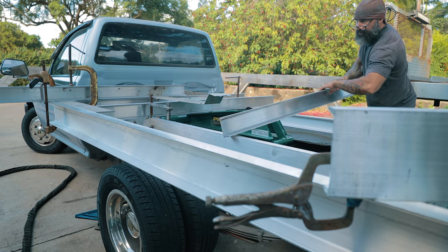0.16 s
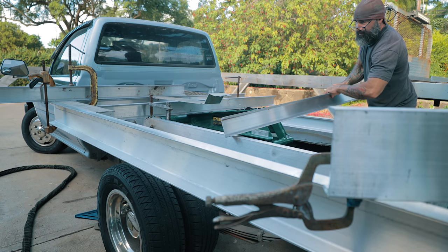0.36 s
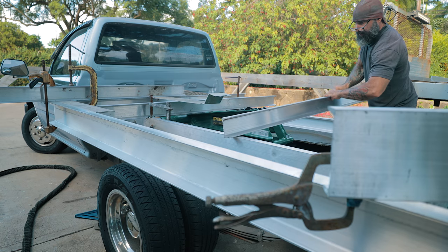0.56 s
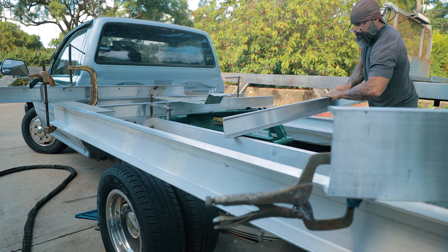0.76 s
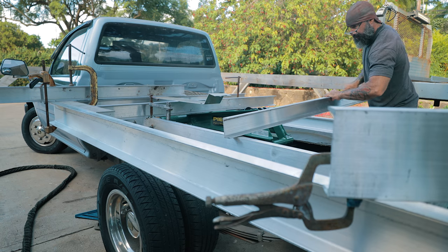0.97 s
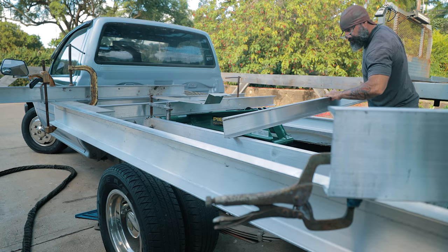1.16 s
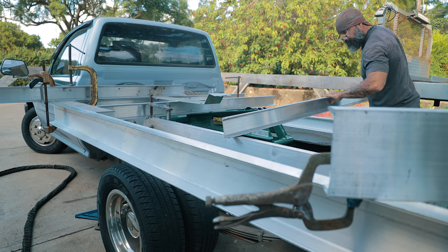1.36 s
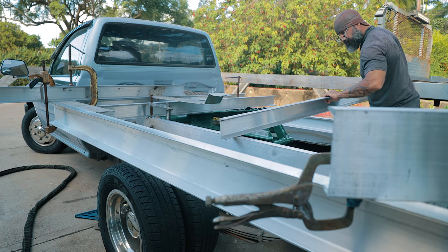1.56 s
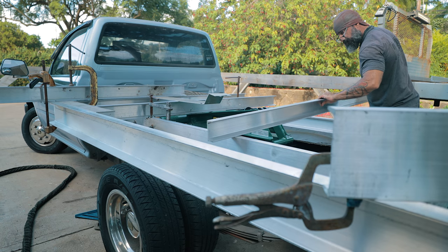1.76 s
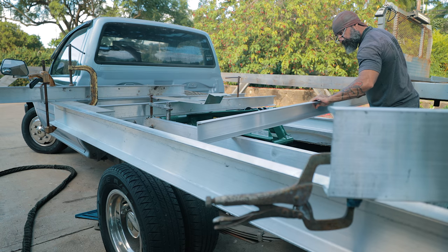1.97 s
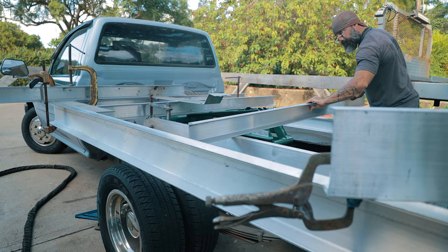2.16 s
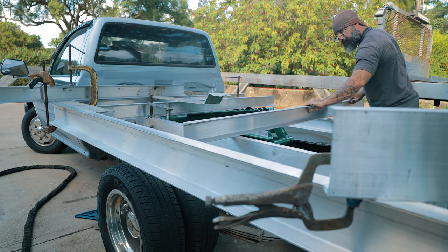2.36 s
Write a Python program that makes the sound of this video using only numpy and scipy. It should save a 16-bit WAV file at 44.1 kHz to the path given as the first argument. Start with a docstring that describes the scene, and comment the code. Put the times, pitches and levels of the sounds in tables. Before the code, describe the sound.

Close mono sound of a long metal channel: brief graze and light knocks, one hard clank with quick rattling bounces, a short ringing decay, near quiet, then a snag and hollow scraping slide outdoors.

```python
"""Metal channel lowered onto a truck bed

An aluminium channel grazes the metal frame of a truck bed outdoors, knocks, drops with a loud rattling
clank and rings out; then it is pushed along the cross members, scraping, groaning and humming.
Blows are decaying noise bands and sine modes; scraping is a stream of tiny catches convolved with the
channel's response; hum and groan are unsteady tones; the yard is steady coloured noise."""
import sys
import numpy as np
from scipy import signal
from scipy.fft import rfft, irfft
from scipy.io import wavfile

SR = 44100
rng = np.random.default_rng(int(sys.argv[2]) if len(sys.argv) > 2 else 0)


def digitize_waveform(pressure):
    """Quantize a signal to 16-bit integers and store it at the path in sys.argv[1].

    Rows of a 2-D input are taken as channels; values are limited to [-1, 1].
    """
    field = np.atleast_2d(pressure).T
    bounded = np.clip(field, -1, 1)
    quanta = np.round(bounded * 32767).astype(np.int16)
    wavfile.write(sys.argv[1], SR, quanta)


N = 105840
TIME = np.arange(N) / SR  # s
BAND_EDGES_HZ = 22 * 2 ** (np.arange(30) / 3)  # third octaves
BAND_CENTRES_HZ = np.sqrt(BAND_EDGES_HZ[1:] * BAND_EDGES_HZ[:-1])
ATTACK_S = 0.002  # linear rise of a blow and of the snag


def from_db(db):
    """Logarithmic level: decibels to amplitude gain."""
    return 10 ** (np.asarray(db) / 20)


def rms_one(x):
    """Power normalisation: scale a signal to unit rms."""
    return x / np.sqrt(np.mean(x ** 2) + 1e-20)


def unit_energy(x):
    """Energy normalisation: scale an impulse response to unit energy."""
    return x / np.sqrt(np.sum(x ** 2) + 1e-20)


def at_hz(points, hz):
    """Logarithmic frequency axis: interpolate a table of (hz, value)."""
    table_hz, value = np.transpose(points)
    return np.interp(np.log(hz), np.log(table_hz), value)


def dying(t, t60):
    """Exponential decay: the amplitude falls by 60 dB in t60 seconds."""
    return np.exp(-np.log(1000) * t / t60)


def drift(rate):
    """Random modulation: normal values, rate per second, joined by straight lines."""
    knots = rng.standard_normal(int(rate * N / SR) + 2)
    return np.interp(TIME * rate, np.arange(len(knots)), knots)


def noise(spectrum):
    """Spectral shaping: white noise filtered to a given colour, with unit rms."""
    hz = np.maximum(np.arange(N // 2 + 1) * SR / N, 1)
    white = rfft(rng.standard_normal(N))
    return rms_one(irfft(white * from_db(at_hz(spectrum, hz)), N))


def noise_bands(spectrum):
    """Filter bank: coloured noise split into overlapping third-octave bands that sum to the whole."""
    whole = rfft(noise(spectrum))
    hz = np.arange(N // 2 + 1) * SR / N
    return [irfft(whole * np.interp(hz, BAND_CENTRES_HZ, share), N)
            for share in np.eye(len(BAND_CENTRES_HZ))]


# spectral shape of the outdoor background: pitch_hz [Hz], density_db [relative dB per Hz]
YARD_SPECTRUM = [(15, -52), (28, -16), (52, 4), (125, -4), (180, -7), (250, -7), (320, -13.5), (600, -13),
                 (1100, -18.5), (1900, -24), (3900, -21), (4600, -28.5), (9000, -35.5), (15500, -42.5)]
YARD_DB = -52.5  # rms level


def yard():
    """Stationary noise: a steady outdoor background of low rumble and faint hiss."""
    return from_db(YARD_DB) * noise(YARD_SPECTRUM)


# level of the bending hum before its flutter: start_s [s], level_db [dB]
HUM_LEVEL = [(0, -38.5), (.11, -50), (.2, -55), (1.0, -88), (1.65, -81), (1.8, -45), (1.95, -43.5),
             (2.07, -39), (2.15, -52), (2.23, -34.5), (2.3, -50), (2.4, -45)]
HUM_HZ, HUM_WANDER_HZ = 107, 4
HUM_FLUTTER_DB, OCTAVE_DB, OCTAVE_FLUTTER_DB = 1.0, -11, 1


def bending_hum():
    """Sustained oscillation: friction keeps the lowest bending mode going, unsteady in pitch and level."""
    pitch_hz = HUM_HZ + HUM_WANDER_HZ * drift(11)
    phase = 2 * np.pi * np.cumsum(pitch_hz) / SR
    level_db = np.interp(TIME, *np.transpose(HUM_LEVEL)) + HUM_FLUTTER_DB * drift(30)
    octave = from_db(OCTAVE_DB + OCTAVE_FLUTTER_DB * drift(23)) * np.sin(2 * phase)
    return from_db(level_db) * rms_one(np.sin(phase) + octave)


# contacts of channel and frame: start_s [s], level_db [dB], then relative to that level:
# bass thud_db [dB], clang_db near 3 kHz [dB], sharp edge_db [dB], free ringing_db of the clear modes [dB]
CONTACTS = [(0.003, -37.5, 12, -4.5, -14, -5.5), (0.221, -25, -3, -7, -9, -20),
            (0.305, -42.5, 11, -22, -17, 2.5), (0.354, -38.5, 19, 4.5, 18.5, 0),
            (0.366, -28, 6.5, -2, -8, -26), (0.388, -30, 9, 7, 10.5, -7.5), (0.432, -28, -5, 2.5, 9, -22),
            (0.492, -38, 11.5, 10, 17, -7.5), (0.651, -16, -6, -1, -1, -2.5),
            (0.675, -22, 5.5, 5.5, 3, -27), (0.706, -23.5, 0, 6, 4.5, -28),
            (0.73, -31.5, -18, 5.5, 12.5, -2), (0.762, -26.5, -9, 5, 6, -31),
            (0.803, -37.5, -12, 11.5, 14, -18), (1.692, -26.5, -12, -11, -5, -21)]
THUD_HZ, BODY_LOW_HZ, BODY_HIGH_HZ = 172, 486, 930
CLANG_LOW_HZ, CLANG_HIGH_HZ, EDGE_HZ = 2160, 3600, 4070


def contact_db(contact, hz):
    """Excitation spectrum: the strength with which one contact drives a frequency."""
    _, level_db, thud_db, clang_db, edge_db, _ = contact
    tilt = [(THUD_HZ, thud_db), (BODY_LOW_HZ, 0), (BODY_HIGH_HZ, 0),
            (CLANG_LOW_HZ, clang_db), (CLANG_HIGH_HZ, clang_db), (EDGE_HZ, edge_db)]
    return level_db + at_hz(tilt, hz)


# crowded weaker modes of channel and frame: pitch_hz [Hz], density_db [relative dB per Hz]
CROWD_SPECTRUM = [(30, -21), (55, -8), (85, -4.5), (150, -10.5), (280, -5.5), (450, 2), (780, 1.5),
                  (1200, -4), (2100, -12), (3850, -12), (4350, -23), (7000, -33), (10000, -41),
                  (15500, -51)]
# decay of the crowded modes: pitch_hz [Hz], t60_s [s]
CROWD_T60 = [(60, 1.32), (170, 0.89), (340, 0.55), (700, 0.41), (1400, 0.35), (3500, 0.25), (6000, 0.22),
             (14000, 0.17)]
CRACK_DB, CRACK_S = -23, 0.002  # slight extra amplitude relative to the tail, and its time constant


def crowded_ringing():
    """Diffuse modal decay: each blow fills the crowded modes, which die faster towards the treble."""
    out = np.zeros(N)
    crack = from_db(CRACK_DB) * np.exp(-TIME / CRACK_S)
    onset = np.minimum(TIME / ATTACK_S, 1) * (1 + crack)
    for hz, band in zip(BAND_CENTRES_HZ, noise_bands(CROWD_SPECTRUM)):
        tail_energy = (onset * dying(TIME, at_hz(CROWD_T60, hz))) ** 2
        energy = np.zeros(N)
        for contact in CONTACTS:
            start = max(int(contact[0] * SR), 0)
            energy[start:] += from_db(contact_db(contact, hz)) ** 2 * tail_energy[:N - start]
        out += band * np.sqrt(energy)
    return out


# clear modes of the channel: pitch_hz [Hz], struck_db [relative dB], t60_s when struck [s],
# sliding_db [relative dB]
CHANNEL_MODES = [(399.6, -23, 0.44, -1), (460.4, -21, 0.71, -2), (488, -12.5, 0.76, -0.5),
                 (566.4, -21, 0.79, 0.5), (753, 3.5, .33, -7), (796, -6, 1.0, -16), (835, 1, .1, -8),
                 (655, -27, 0.16, -17), (729, -16, 0.16, -35), (894, -5, 0.52, -16), (992, -6.5, 0.6, -7.5),
                 (1145, -7, 0.51, -10.5), (1386, -12, 0.75, -42), (1736, -10.5, 0.34, -16),
                 (1956, -9, 0.21, -18), (2198, -10, .45, -26.5), (2855, -15, 0.52, -3),
                 (3419, -7.5, 0.23, -10), (3840, -25, 0.35, -17), (4810, -27.5, 0.42, -30),
                 (6120, -27, 0.27, -38), (7370, -42, 0.55, -17)]
STRUCK_MODES_DB, MODE_SCATTER_DB = -2, 1.0
CONTACT_S = 0.0003  # time constant with which a mode builds up


def clear_ringing():
    """Modal superposition: every blow adds energy to each clear mode, with a strength of its own."""
    out = np.zeros(N)
    scatter_db = MODE_SCATTER_DB * rng.standard_normal((len(CONTACTS), len(CHANNEL_MODES)))
    for k, (hz, struck_db, t60, _) in enumerate(CHANNEL_MODES):
        tail_energy = (dying(TIME, t60) * (1 - np.exp(-TIME / CONTACT_S))) ** 2
        energy = np.zeros(N)
        for contact, luck_db in zip(CONTACTS, scatter_db):
            start = max(int(contact[0] * SR), 0)
            ringing_db = contact[-1]
            level_db = STRUCK_MODES_DB + struck_db + contact_db(contact, hz) + ringing_db + luck_db[k]
            energy[start:] += from_db(level_db) ** 2 * tail_energy[:N - start]
        out += np.sqrt(energy) * np.sin(2 * np.pi * (hz * TIME + rng.random()))
    return out


# crowded modes while sliding: pitch_hz [Hz], density_db [relative dB per Hz]
SCRAPE_SPECTRUM = [(60, -34), (140, -12), (210, -2.5), (280, -12), (400, 2), (580, 1), (720, -6),
                   (1200, -8), (1550, -11), (2400, -9), (3850, -10), (4500, -23.5), (6000, -27),
                   (9000, -35.5), (15500, -45)]
SCRAPE_T60_S, SCRAPE_MODES_DB = 0.14, -3
HAND_DAMPING = 0.22  # the hand shortens the clear modes' t60 by this factor
RASP_HZ, HISS_HZ = 1350, 5030  # lower limits of rasp and hiss


def sliding_response():
    """Impulse response: the hand-held channel after one tiny catch, split into body, rasp and hiss."""
    t = TIME[:SR // 2]
    crowd = unit_energy(noise(SCRAPE_SPECTRUM)[:len(t)] * dying(t, SCRAPE_T60_S))
    modes = np.zeros(len(t))
    for k, (hz, _, t60, sliding_db) in enumerate(CHANNEL_MODES):
        tone = np.sin(2 * np.pi * hz * t) * dying(t, t60 * HAND_DAMPING)
        modes += from_db(sliding_db) * tone * (-1) ** k  # alternating polarity
    response = crowd + from_db(SCRAPE_MODES_DB) * unit_energy(modes)
    zones = []
    for hz, kind in [(RASP_HZ, "low"), ([RASP_HZ, HISS_HZ], "band"), (HISS_HZ, "high")]:
        zone_filter = signal.butter(4, hz, kind, fs=SR, output="sos")
        zones.append(unit_energy(signal.sosfilt(zone_filter, response)))
    return zones


# first touch along the frame: start_s [s], body_db, rasp_db, hiss_db [dB before the zone gains]
GRAZE_STROKE = [(0.005, -28.5, -26, -41.5), (0.044, -45.5, -73, -70), (0.102, -45, -59.5, -56.5),
                (0.17, -45, -62, -66), (0.2, -40, -55, -70), (0.215, -41, -55, -63.5)]
# push along the cross members: same columns and units
PUSH_STROKE = [(1.53, -61.5, -80, -85), (1.576, -43, -54.5, -80), (1.603, -34, -44, -52.5),
               (1.66, -37, -47.5, -60), (1.706, -27.5, -38, -54), (1.735, -29.5, -39.5, -58),
               (1.764, -28.5, -40, -47.5), (1.79, -24, -34.5, -45.5), (1.831, -25.5, -36.5, -50),
               (1.85, -32.5, -48, -52.5), (1.899, -32.5, -45, -49), (1.922, -28.5, -35.5, -48.5),
               (2.0, -27.5, -42, -50), (2.151, -30, -39, -54), (2.208, -35.5, -49, -55),
               (2.244, -36.5, -41.5, -50), (2.314, -37, -43, -51), (2.4, -45, -56, -67)]
ZONE_GAINS_DB = (-1, -2, -2)  # body, rasp, hiss
SCRAPE_BUILD_S = 0.013  # the force leads the table times by this, as the ringing takes time to build
SLIDE_FADE_S = 0.09  # time constant outside a stroke
CATCHES_PER_S, CATCH_SPREAD_DB = 2500, 0.5  # mean rate in one draw; exponential spread of sizes


def scraping():
    """Random impulse excitation: burrs catch and let go in a dense uneven stream that drives the channel."""
    size_db = CATCH_SPREAD_DB * np.minimum(rng.exponential(1, N), 4)
    sizes = from_db(size_db) * rng.choice([-1, 1], N)
    catches = rms_one(sizes * (rng.random(N) < CATCHES_PER_S / SR))
    out = np.zeros(N)
    t = TIME + SCRAPE_BUILD_S
    for k, (response, gain_db) in enumerate(zip(sliding_response(), ZONE_GAINS_DB)):
        force = np.zeros(N)
        for stroke in (np.array(GRAZE_STROKE), np.array(PUSH_STROKE)):
            start_s = stroke[:, 0]
            outside_s = np.abs(t - np.clip(t, start_s[0], start_s[-1]))
            level_db = gain_db + np.interp(t, start_s, stroke[:, k + 1])
            force += from_db(level_db) * np.exp(-outside_s / SLIDE_FADE_S)
        out += signal.fftconvolve(catches * force, response)[:N]
    return out


def sliding():
    """Incoherent addition: two independent draws, averaged in power, give a more even scraping sound."""
    return (scraping() + scraping()) / np.sqrt(2)


# stick-slip groan before jitter and flutter: start_s [s], pitch_hz [Hz], level_db [dB]
GROAN_PATH = [(1.598, 650, -46), (1.65, 643, -38.5), (1.697, 611, -32), (1.735, 577, -37),
              (1.765, 560, -70), (1.812, 561, -25), (1.839, 564, -32), (1.87, 580, -68)]
GROAN_JITTER_HZ, GROAN_FLUTTER_DB = 22.7, 1.5


def groan():
    """Stick-slip oscillation: as the channel starts to move, friction locks into a rough, falling tone."""
    start_s, pitch_hz, level_db = np.transpose(GROAN_PATH)
    rough_hz = np.interp(TIME, start_s, pitch_hz) + GROAN_JITTER_HZ * drift(150)
    phase = 2 * np.pi * np.cumsum(rough_hz) / SR
    level = from_db(np.interp(TIME, start_s, level_db) + GROAN_FLUTTER_DB * drift(100))
    active = (TIME > start_s[0]) & (TIME < start_s[-1])
    return level * active * rms_one(np.sin(phase))


# upper modes rung by the snag: pitch_hz [Hz], density_db [relative dB per Hz]
SNAG_SPECTRUM = [(30, -61), (1450, -32), (1720, 12), (1950, -4.5), (2300, -3), (2800, -11), (3600, -7),
                 (4500, -19), (8000, -33), (15500, -56)]
SNAG_S, SNAG_DB, SNAG_T60_S = 1.672, -27, 0.17


def snag():
    """Sudden release: the edge catches and snaps free, ringing only the upper modes as decaying noise."""
    t = np.maximum(TIME - SNAG_S, 0)
    envelope = np.minimum(t / ATTACK_S, 1) * dying(t, SNAG_T60_S)
    return from_db(SNAG_DB) * noise(SNAG_SPECTRUM) * envelope


def scene():
    """Linear superposition: yard, hum, blows and sliding add at one microphone."""
    blows = crowded_ringing() + clear_ringing()
    friction = sliding() + groan() + snag()
    return (yard() + bending_hum() + blows + friction)[None]


CUTOFF_HZ = 15750


def record(dry):
    """Low-pass filtering: a steep elliptic filter removes the top of the spectrum."""
    low_pass = signal.ellip(12, .1, 90, CUTOFF_HZ, fs=SR, output="sos")
    return signal.sosfilt(low_pass, dry)


dry = scene()
out = record(dry)
digitize_waveform(out)
```